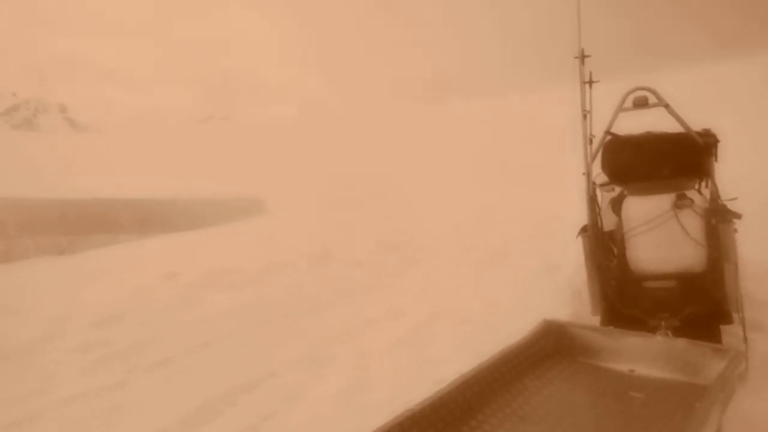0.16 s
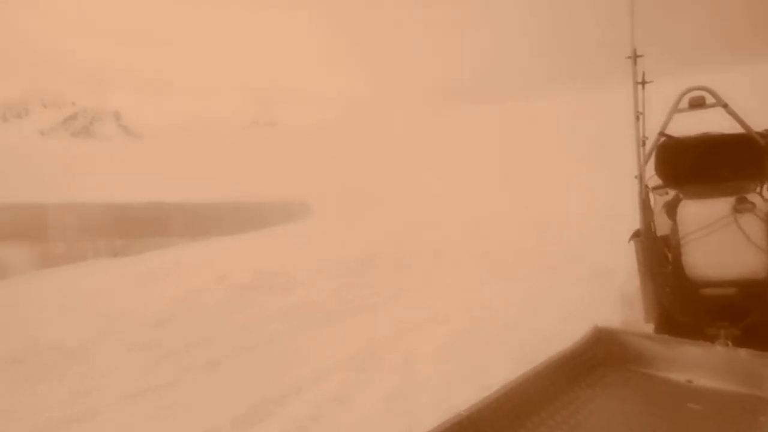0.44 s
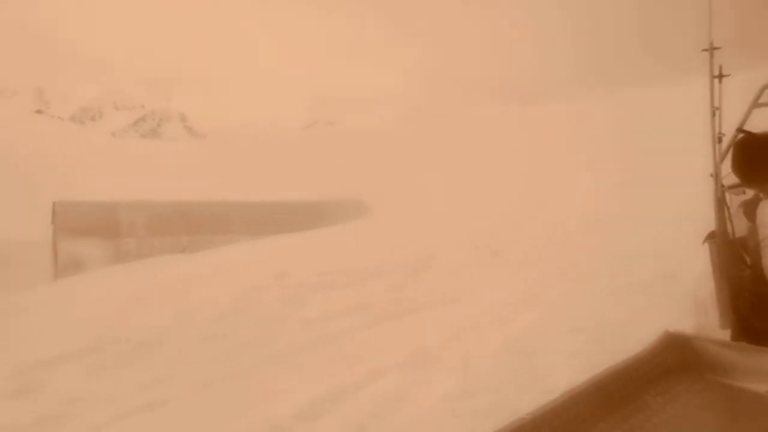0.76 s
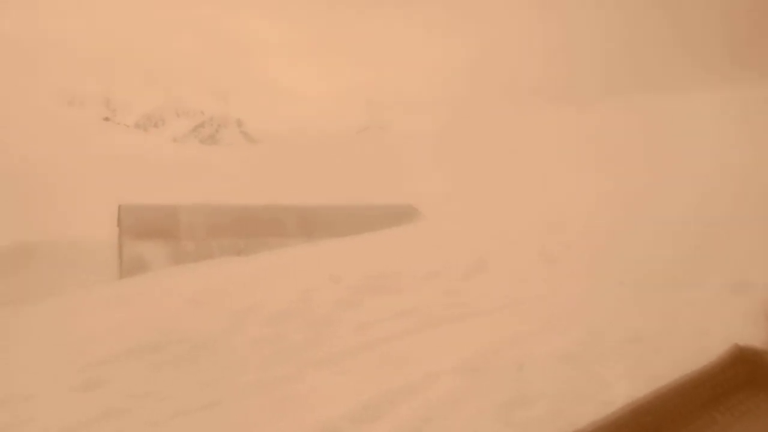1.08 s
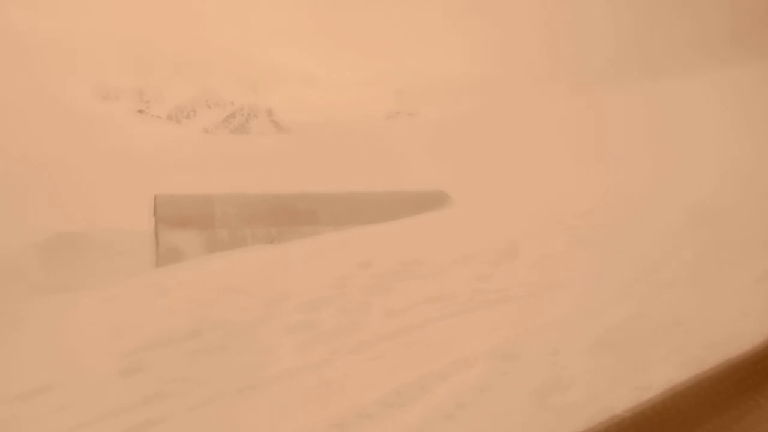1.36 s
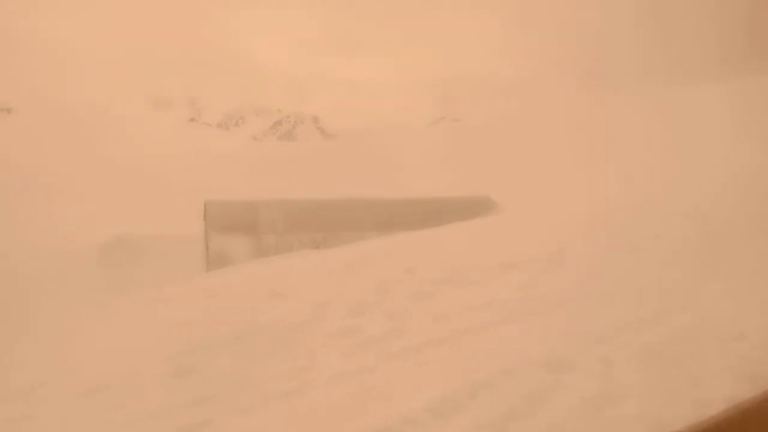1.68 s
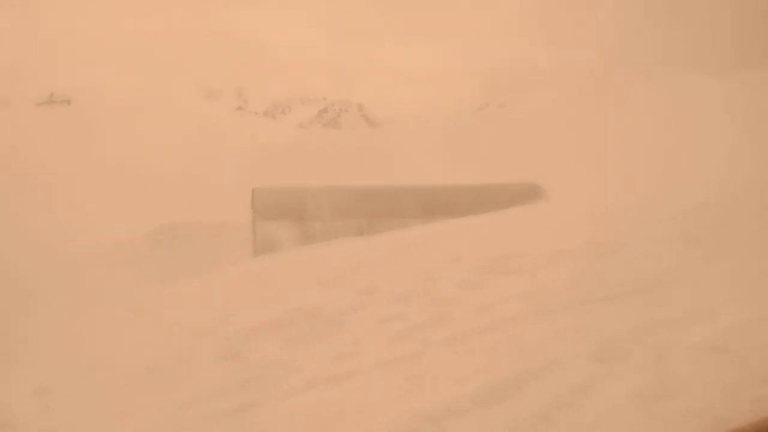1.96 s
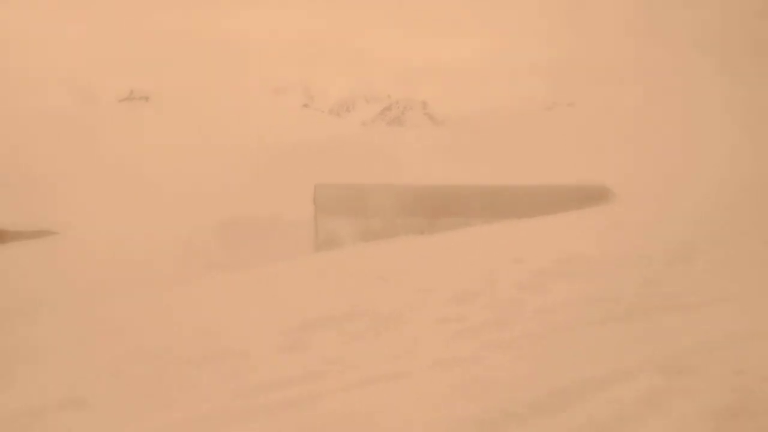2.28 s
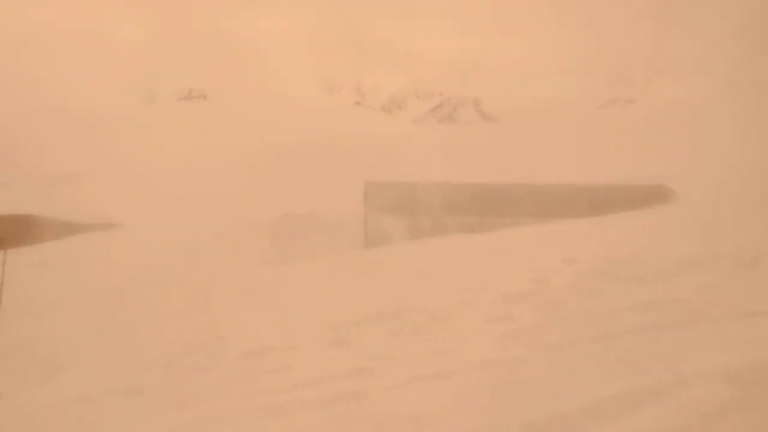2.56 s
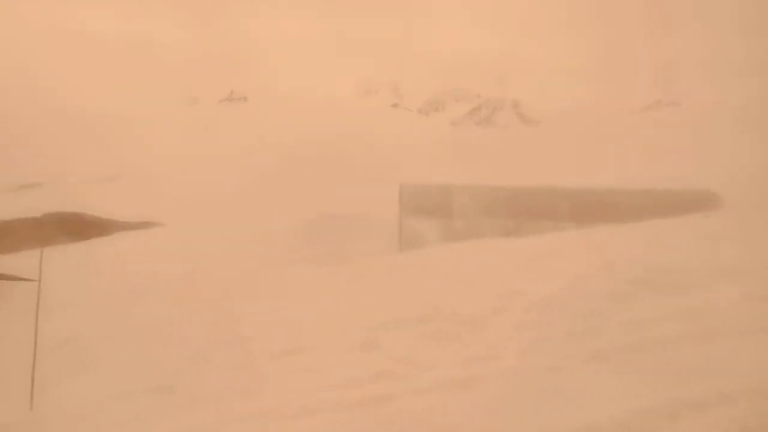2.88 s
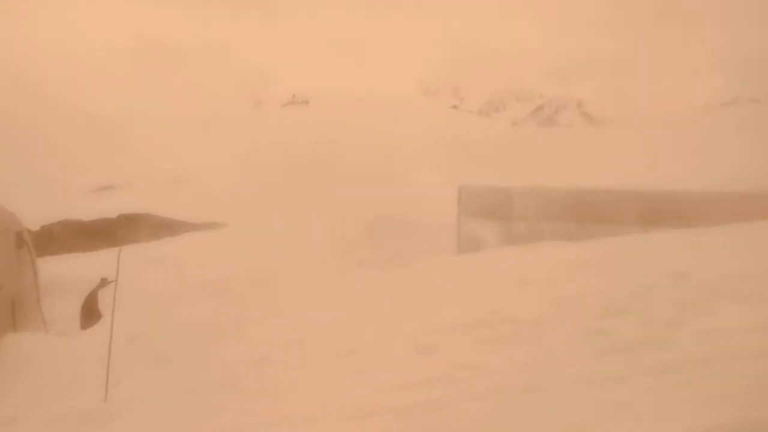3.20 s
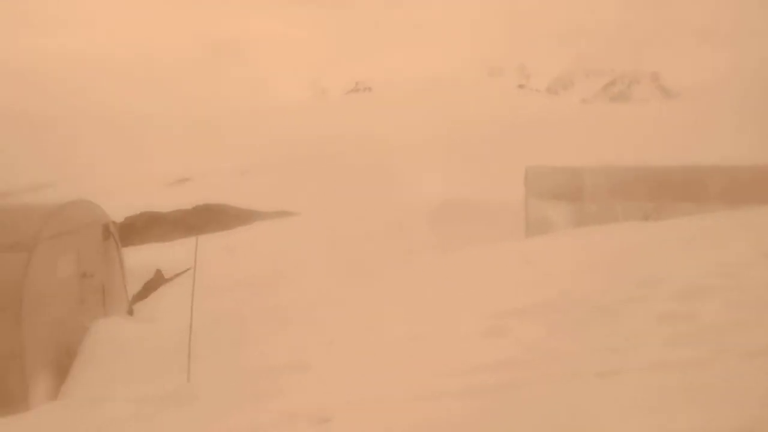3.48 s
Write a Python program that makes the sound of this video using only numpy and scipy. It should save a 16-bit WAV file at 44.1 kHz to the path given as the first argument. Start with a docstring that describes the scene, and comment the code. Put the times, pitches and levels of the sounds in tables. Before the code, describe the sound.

Violent wind rumble batters a handheld microphone, clipping at times, with one hard knock late.

```python
"""A small camera held in a blizzard, heard through its wind-battered microphone.
From the start, gusts heave and flutter the membrane, fine crackle tears at the port over a far roar, and
snow hisses past: all shaped noise, with random small dips for eddies and tiny random contacts for grains.
Soon hard shoves swing the membrane in and back, and strong eddies suck it in and shed puffs of turbulence.
Late on comes one hard knock, a decaying low ring. The input clips the loudest swings."""
import sys
import numpy as np
from scipy.fft import rfft, irfft, next_fast_len
from scipy.io import wavfile
from scipy.ndimage import map_coordinates

SR = 44100
rng = np.random.default_rng(int(sys.argv[2]) if len(sys.argv) > 2 else 0)


def generate_wav(sig):
    """Save sig (samples, or channels by samples) to the path in sys.argv[1] as 16-bit PCM at SR."""
    pcm = np.round(np.clip(np.atleast_2d(sig).T, -1, 1) * 32767).astype(np.int16)
    wavfile.write(sys.argv[1], SR, pcm)


N = 160524  # samples

# Spectra give relative levels: noise made from them is brought to rms 1.
# Gusts over time: start_s, heave_level_db, flutter_level_db
GUST_LEVELS = [(0, -21, -38.5), (.12, -15.5, -24), (.16, -22.5, -37), (.26, -16.5, -38.5), (.31, -19, -27),
               (.42, -18, -35), (.47, -11.5, -25.5), (.56, -22.5, -43), (.65, -23.5, -40.5),
               (.68, -17, -35.5), (.8, -15, -24.5), (.92, -12, -28.5), (.94, -25.5, -38),
               (1.12, -12, -30.5), (1.145, -29, -54), (1.23, -31, -51), (1.26, -21, -33),
               (1.45, -21.5, -34.5), (1.54, -28.5, -41), (1.6, -19, -36), (1.85, -18, -39.5),
               (1.9, -17.5, -28.5), (2.16, -16.5, -35.5), (2.2, -23.5, -39), (2.46, -22, -42.5),
               (2.51, -16, -25), (2.57, -23.5, -35.5), (2.65, -16.5, -29.5), (2.83, -24.5, -40.5),
               (2.9, -20.5, -31), (3.06, -26.5, -43), (3.22, -15, -28), (3.27, -24.5, -38),
               (3.39, -19, -26.5), (3.52, -25.5, -43.5), (3.64, -13.5, -25)]
# Spectrum of the slow heaves: frequency_hz, density_db (per Hz)
HEAVE_SPECTRUM = [(3, 4), (14, 2), (42, 0.5), (160, -15.5), (300, -69.5)]
# Spectrum of the flutter: frequency_hz, density_db (per Hz)
FLUTTER_SPECTRUM = [(60, -24.5), (150, -1), (300, -5.5), (600, -22), (1500, -39.5), (5000, -68.5)]
HEAVE_LUMPS_DB, FLUTTER_LUMPS_DB = 2, 3  # depth of the random swells, per unit of wobble

# Small eddies: how many, level over the flutter, spread of levels, middle width
SWIRLS_PER_S, SWIRL_DB, SWIRL_SPREAD_DB, SWIRL_MS = 160, 1, 5, 0.9
TIP = 0.43  # rounding of an eddy dip's point, in widths

# Spectrum of turbulence, in eddy puffs and crackle: frequency_hz, density_db (per Hz)
TURBULENCE_SPECTRUM = [(200, -4), (600, -1.5), (1500, -13), (3000, -27.5), (8000, -61)]
# Crackle: level against the flutter, gain reached at the end, depth of its rags per unit of wobble
CRACKLE_DB, CRACKLE_GAIN_DB, CRACKLE_LUMPS_DB = -23, 12.5, 9.5
# Spectrum of the far wind: frequency_hz, density_db (per Hz)
ROAR_SPECTRUM = [(300, -7), (1600, 8), (3200, -6), (6000, -38)]
# Far wind over time, before its random swell: start_s, level_db
ROAR_LEVELS = [(0, -50.5), (1.2, -68), (3.64, -71)]

# Snow hiss over time, before it follows the gusts and flickers: start_s, level_db
SNOW_LEVELS = [(0, -61.5), (.4, -59), (1.1, -64), (1.5, -78.5), (2.0, -68), (2.6, -67), (3.64, -66.5)]
# Spectrum of the snow hiss: frequency_hz, density_db (per Hz)
HISS_SPECTRUM = [(300, -21), (1500, 6), (3500, -1), (6000, -14.5), (9000, 2), (11000, -4)]
HISS_FOLLOWS = 0.31  # dB of hiss for each dB of flutter
HISS_SWELL_DB, HISS_FLICKER_DB = 2.5, 3.6  # slow and quick patchiness, per unit of wobble
# Strong grain ticks, before the case colours them: start_s, level_db
TICK_EVENTS = [(0.3656, -23.5), (0.4506, -32), (0.4703, -30), (0.4973, -31), (0.7134, -33), (0.7688, -24.5),
               (0.8671, -23.5), (1.276, -37), (1.7782, -35.5), (1.8402, -35.5), (2.1834, -32),
               (2.3189, -33.5), (2.599, -21.5), (2.6569, -32), (2.8598, -33), (3.2021, -25.5),
               (3.2134, -35)]
# Response of the case to a tick: frequency_hz, gain_db
TICK_RESPONSE = [(300, 13), (1500, 11.5), (11000, 7)]
GRAINS_PER_S, GRAIN_DB, GRAIN_SPREAD_DB = 150, 9, 4.5  # faint grains: level over the hiss, spread

# Hardest shoves, before the membrane's swing (the pair at 2.495 s is the knock's jolt): centre_s, depth_db,
# width_ms
SHOVE_EVENTS = [(0.093, -3.5, 4.8), (.275, -5, 6), (0.45, -3.5, 2.9), (0.466, -1.5, 4.7),
                (0.783, -6.5, 1.26), (0.807, 3, 2), (0.856, -2, 2.5), (1.017, 0.5, 2), (1.279, -3.5, 3.5),
                (1.345, -6.5, 6.3), (1.595, -2, 5.5), (1.992, -7.5, 6.5), (2.495, -9.5, 0.98),
                (2.4974, -1, 1.64), (2.599, -3, 2.1), (2.859, -6.5, 2.3), (2.977, -0.5, 4.2),
                (3.199, 1, 1.86), (3.43, -2.5, 6)]
REBOUND_HZ, REBOUND_WIDTH_HZ = 19.4, 31.8  # the membrane's resonance and its damping

# Strong eddies, a reference level for both dip and puff: start_s, level_db
EDDY_EVENTS = [(0.111, -25.5), (.398, -31), (0.695, -26.5), (0.738, -20.5), (1.115, -27), (1.275, -22.5),
               (1.294, -28.5), (1.337, -22), (1.588, -35.5), (1.882, -31.5), (1.955, -30), (1.985, -19),
               (1.997, -21.5), (2.007, -28), (2.082, -29), (2.092, -28), (2.239, -33), (2.588, -25),
               (2.62, -23.5), (2.701, -21.5), (2.73, -29), (2.762, -34), (2.859, -15.5), (2.88, -24),
               (2.9, -23.5), (2.947, -27.5), (2.975, -24.5), (3, -26), (3.173, -34), (3.198, -26),
               (3.226, -23.5), (3.292, -32.5), (3.318, -27), (3.371, -23), (3.385, -21.5), (3.445, -29.5),
               (3.56, -29), (3.578, -25.5), (3.602, -21)]
EDDY_DB, SPLASH_DB = 10, -4  # dip and puff against the listed level
EDDY_MS = 0.68  # middle width of the dips
SPLASH_RISE_S, SPLASH_LUMPS_DB = 0.003, 6  # swell of the puff, its raggedness per unit of wobble

KNOCK_S, KNOCK_DB, KNOCK_HZ, KNOCK_T60_S = 2.4913, -3, 209.5, 0.051

BASS_HZ, PORT_HZ = 2, 10600  # low cut; where the covered port halves airborne sound
CLIP_UP, CLIP_DOWN = 0.705, 0.66  # full scale is 1
TOP_HZ = 16800  # band limit


def amp(db):
    """Decibels to linear amplitude."""
    return 10 ** (np.asarray(db) / 20)


def unit(x):
    """Scales a signal to rms 1."""
    return x / np.sqrt(np.mean(x ** 2) + 1e-20)


def along(points, hz):
    """Reads a frequency curve on a log axis."""
    f, v = np.transpose(points)
    return np.interp(np.log(hz + 1), np.log(f + 1), v)


def curves(rows):
    """One value per sample for each column after the time."""
    s, *cols = np.transpose(rows)
    return [np.interp(np.arange(N) / SR, s, c) for c in cols]


def wobble(rate):
    """A smooth random curve through rate knots a second."""
    knots = rng.standard_normal(int(N * rate / SR) + 4)
    return map_coordinates(knots, [np.arange(N) * rate / SR])


def filtered(x, response):
    """Shapes x by a response of frequency."""
    m = next_fast_len(N + SR // 2)
    return irfft(rfft(x, m) * response(np.fft.rfftfreq(m, 1 / SR)), m)[:N]


def noise(spectrum):
    """Coloured noise of rms 1."""
    return unit(filtered(rng.standard_normal(N), lambda hz: amp(along(spectrum, hz))))


def laid(times, shapes, lead):
    """Sums one row of samples per event, starting lead samples before its time."""
    at = np.round(times * SR).astype(int)[:, None] + np.arange(shapes.shape[1]) - lead
    ok = (at >= 0) & (at < N)
    return np.bincount(at[ok], shapes[ok], N)


def dips(times, level_db, width_ms, tip):
    """Drops of pressure with a rounded point and steep sides."""
    t = np.arange(-900, 900) / SR
    widths_s = np.abs(width_ms)[:, None] / 1000
    u = np.hypot(t / widths_s, tip) - abs(tip)
    return laid(times, -amp(level_db)[:, None] * np.exp(-u - 0.12 * u * u), lead=900)


def bursts(times, level_db, peak_s, air):
    """Puffs cut from turbulent air that swell to a peak and die, each at its own level."""
    u = np.arange(SR // 20) / SR / peak_s
    swell = (u * np.exp(1 - u)) ** 2
    cuts = (times * SR).astype(int)[:, None] + np.arange(len(u))
    puffs = swell * air[cuts % N]
    # give every puff the energy of its swell, however loud the air it was cut from
    even = np.linalg.norm(swell) / np.linalg.norm(puffs, axis=1, keepdims=True)
    return laid(times, amp(level_db)[:, None] * puffs * even, lead=110)


def wind():
    """Slow heaves, lumpy flutter and a swarm of small eddy dips, all following the gusts."""
    heave_db, flutter_db = curves(GUST_LEVELS)
    heave = amp(heave_db) * unit(amp(HEAVE_LUMPS_DB * wobble(14)) * noise(HEAVE_SPECTRUM))
    lumps_db = FLUTTER_LUMPS_DB * (wobble(25.08) + 1.33 * wobble(90))
    flutter = amp(flutter_db) * unit(amp(lumps_db) * noise(FLUTTER_SPECTRUM))

    draw = rng.random((int(SWIRLS_PER_S * N / SR), 3))  # place, size, width
    s = draw[:, 0] * (N - 1) / SR
    local_db = flutter_db[(s * SR).astype(int)]
    size_db = local_db + SWIRL_DB - SWIRL_SPREAD_DB * np.log(draw[:, 1] + 1 / 20)  # few are large
    width_ms = SWIRL_MS * np.exp(1.37 * (draw[:, 2] - 0.5))
    return heave + flutter + dips(s, size_db, width_ms, TIP)


def crackle():
    """Fine turbulence tears at the port in short rags, more as the camera turns into the wind."""
    level_db = curves(GUST_LEVELS)[1] + CRACKLE_DB + CRACKLE_GAIN_DB * np.arange(N) / N
    lumps = np.minimum(wobble(90) + 1.4 * wobble(300), 2.5)
    rags = unit(amp(CRACKLE_LUMPS_DB * lumps) * noise(TURBULENCE_SPECTRUM))
    return amp(level_db) * rags


def roar():
    """Far wind: broad noise with a gentle random swell."""
    level_db = curves(ROAR_LEVELS)[0] + 0.81 * wobble(7.5)
    return amp(level_db) * noise(ROAR_SPECTRUM)


def snow():
    """Grains tick on the case as brief chatter, over a patchy hiss of passing snow."""
    flutter_db = curves(GUST_LEVELS)[1]
    hiss_db = curves(SNOW_LEVELS)[0] + HISS_FOLLOWS * (flutter_db - flutter_db.mean())
    hiss_db = hiss_db + HISS_SWELL_DB * wobble(10) + HISS_FLICKER_DB * wobble(35.1)
    hiss = amp(hiss_db) * noise(HISS_SPECTRUM)

    draw = rng.random((int(GRAINS_PER_S * N / SR), 2))  # place, size
    s = draw[:, 0] * (N - 1) / SR
    local_db = hiss_db[(s * SR).astype(int)]
    size_db = local_db + GRAIN_DB - GRAIN_SPREAD_DB * np.log(draw[:, 1] + 1 / 20)

    big_s, big_db = np.transpose(TICK_EVENTS)
    times = np.r_[big_s + 0.001, s]
    level = amp(np.r_[big_db, size_db])[:, None]
    # a few samples of chatter: random signs, 9 dB weaker each sample
    contact = level * amp(-9 * np.arange(12)) * rng.choice([-1, 1], (len(level), 12))
    ticks = filtered(laid(times, contact, lead=0), lambda hz: amp(along(TICK_RESPONSE, hz)))
    return hiss + ticks


def shoves():
    """The hardest gusts drive the membrane in, and the knock jolts it in at 2.495 s; as a damped spring it
    swings back past rest."""
    s, db, ms = np.transpose(SHOVE_EVENTS)

    def spring(hz):
        return -hz * hz / (REBOUND_HZ ** 2 - hz * hz + 1j * hz * REBOUND_WIDTH_HZ)

    return filtered(dips(s, db, ms, tip=0.87), spring)


def eddies():
    """Each strong eddy sucks the membrane in and sheds a ragged puff of turbulence."""
    s, db = np.transpose(EDDY_EVENTS)
    air = amp(SPLASH_LUMPS_DB * wobble(250)) * noise(TURBULENCE_SPECTRUM)
    puffs = bursts(s, db + SPLASH_DB, SPLASH_RISE_S, air)
    width_ms = EDDY_MS * np.exp(0.33 * rng.standard_normal(len(s)))
    return dips(s + 0.001496, db + EDDY_DB, width_ms, TIP) + puffs


def knock():
    """The case jumps: a step in pressure that rings out low."""
    t = np.arange(SR // 10) / SR
    ring = amp(KNOCK_DB - 60 * t / KNOCK_T60_S) * np.cos(2 * np.pi * KNOCK_HZ * t - 0.6)
    return laid(np.array([KNOCK_S]), ring[None], lead=0)


def scene():
    """Airborne sound passes the covered port; the knock comes through the case, past the port."""
    air = wind() + crackle() + roar() + snow() + shoves() + eddies()

    def port(hz):
        low_cut = 1j * hz / (BASS_HZ + 1j * hz)
        return low_cut / (1 + (hz / PORT_HZ) ** 30)

    return (filtered(air, port) + knock())[None]


def record(dry):
    """The input clips a little sooner on the negative side; nothing passes above the band limit."""
    def edge(hz):
        return np.clip((TOP_HZ - hz) / 600, 0, 1) ** 2

    return filtered(np.clip(dry[0], -CLIP_DOWN, CLIP_UP), edge)[None]


dry = scene()
out = record(dry)
generate_wav(out)
```